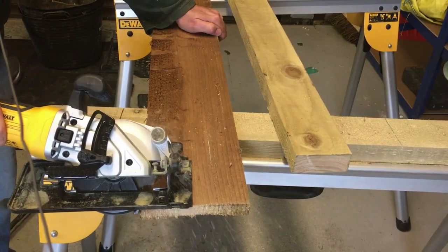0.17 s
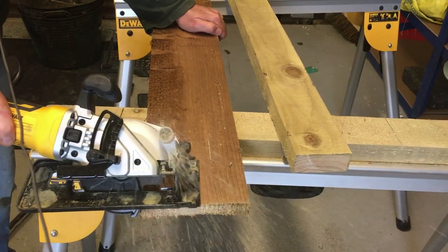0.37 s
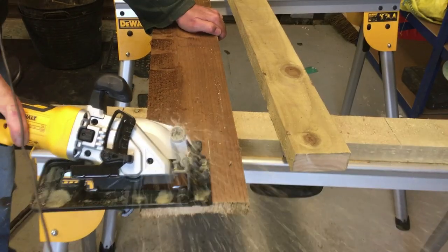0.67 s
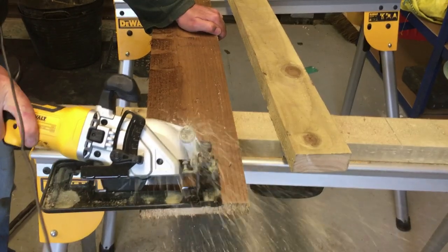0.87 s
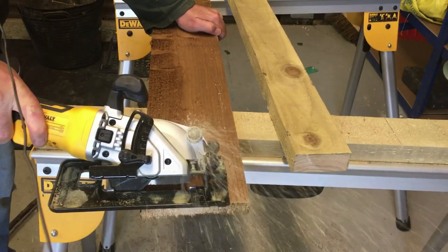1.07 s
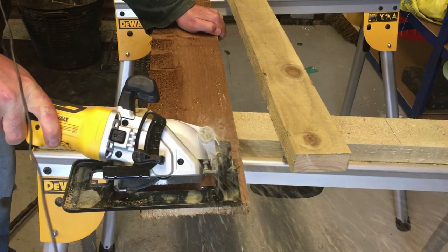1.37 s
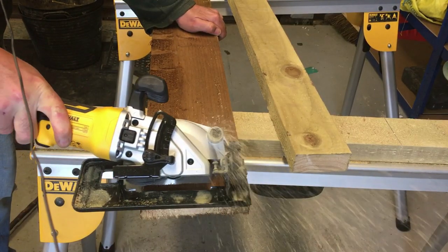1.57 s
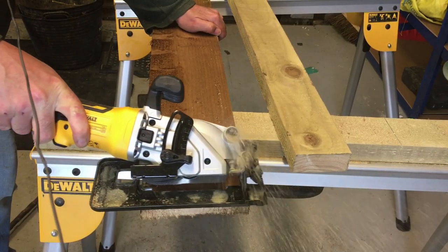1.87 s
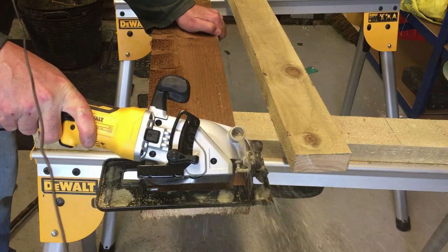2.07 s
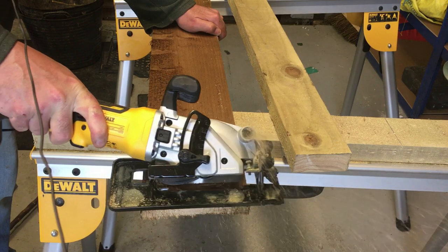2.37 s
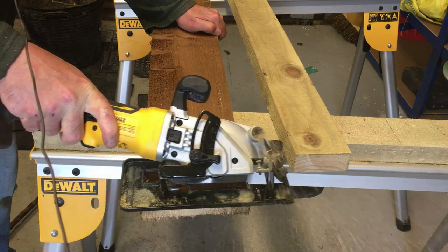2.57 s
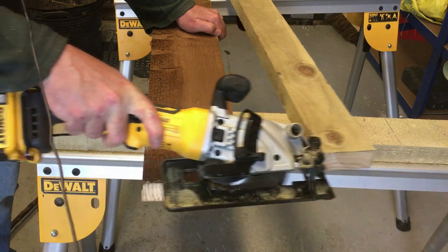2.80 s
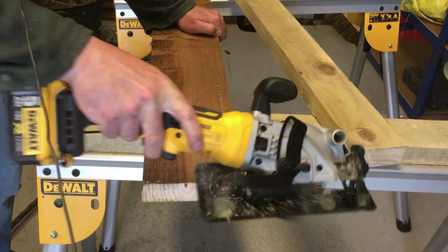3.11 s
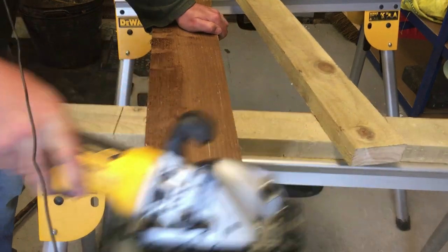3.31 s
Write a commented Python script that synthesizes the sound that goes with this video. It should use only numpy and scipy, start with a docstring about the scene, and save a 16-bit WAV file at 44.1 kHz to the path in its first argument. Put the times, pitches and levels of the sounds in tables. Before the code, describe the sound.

Close up in a garage, a cordless circular saw whines and bites into wood, squealing briefly and dropping in pitch. The last fibres splinter, the motor speeds up again, and the blade brakes with a knock and faint ringing.

```python
"""A small cordless circular saw crosscuts a board in a garage, heard close up on one mono microphone.
First the geared motor whines and the fan rushes. The teeth graze, then bite; the motor sags under
the load, brief high squeals come and go, and the last fibres splinter. The blade comes free;
just after 3 s the brake stops it with a knock and a rattle, and it rings out.
The walls answer briefly throughout, and a limiter holds the peaks."""
import sys
import numpy as np
from scipy import signal
from scipy.fft import rfft, irfft, next_fast_len
from scipy.io import wavfile
from scipy.ndimage import uniform_filter1d, minimum_filter1d, map_coordinates

SR = 44100
rng = np.random.default_rng(int(sys.argv[2]) if len(sys.argv) > 2 else 0)


def store_wav(level_fs):
    """Save 16-bit WAV to argv[1]."""
    pcm = np.round(np.clip(np.atleast_2d(level_fs), -1, 1) * 32767)
    wavfile.write(sys.argv[1], SR, pcm.T.astype(np.int16))


N = 152145

TEETH, FAN_BLADES, GEAR_RATIO = 24, 9, 5.918  # the ratio is motor turns per blade turn
LIFT_S, BRAKE_S = 2.66, 3.071
CHATTER_S, CHATTER_PER_S = 7e-6, 190  # timing jitter of the strikes, and how fast it varies
SHUDDER_PER_S, SHUDDER_SHARE = 520, 0.42  # the faster part of the chatter, and its share of the power
GARAGE_DB, ROOM_TONE_DB = -10.5, -83.5
CEILING_DB, LIMITER_S, TOP_HZ = -28.2, 0.001, 15740

# The motor sags under load (time [s], speed [turns/s])
MOTOR_SPEED = [(0, 440), (.28, 433), (.45, 442), (.9, 440), (1.0, 449), (1.15, 427), (1.3, 401),
               (1.42, 390), (1.55, 356), (1.68, 334), (1.8, 330), (1.94, 326), (2.02, 331), (2.06, 348),
               (2.09, 388), (2.16, 411), (2.23, 414), (2.3, 426), (2.42, 394), (2.52, 389), (2.6, 398),
               (2.68, 447), (2.75, 470), (2.87, 440), (3.07, 440)]
# Unevenness of the strikes (time [s], roughness [0-1])
ROUGHNESS = [(0, .4), (1.0, .45), (1.15, .75), (1.45, .45), (1.7, .88), (2.05, .97), (2.15, .6),
             (2.35, .75), (2.55, .65), (2.7, .85)]
# The strikes stray in time as the cut deepens (time [s], stray [s])
STRIKE_STRAY = [(.9, .000003), (1.15, .000007), (1.4, .000005), (1.75, .000013), (2.05, .000014),
                (2.2, .000008), (2.6, .00001)]

# Each source over the cut (time [s], level [dB])
BITE_LEVEL = [(0, -73), (.3, -72), (.8, -61), (1.02, -66), (1.16, -55), (1.27, -66), (1.4, -60.5),
              (1.58, -54), (1.72, -44), (1.94, -44), (2.03, -39), (2.08, -61), (2.17, -48.5), (2.3, -49.5),
              (2.42, -49), (2.61, -53), (2.72, -61), (2.85, -85)]  # force of the teeth on the wood
HOWL_BOOST = [(0, 6), (.8, -7), (1.22, -6), (1.36, 10), (1.47, -3), (1.58, 1), (1.8, -1.5), (2.04, -3),
              (2.12, -2), (2.6, -3), (2.7, 16)]  # added mainly to the lowest tooth tones as the board howls
ZING_LEVEL = [(.2, -65), (.32, -58.5), (.8, -61.5), (.92, -59), (1.02, -63), (1.1, -58), (1.17, -54),
              (1.27, -62.5), (1.45, -63.5), (1.6, -55), (1.95, -52), (2.02, -41), (2.1, -61.5),
              (2.19, -51.5), (2.3, -55.5), (2.47, -56), (2.55, -49), (2.61, -51.5), (2.72, -68),
              (2.85, -86)]  # high overtones of the tooth rate
ZING_HALFWAY_OFFSET = [(.9, -5), (1.17, -11), (1.3, -5), (2.3, -6), (2.5, -8)]  # added to the tones halfway between those overtones
SINGING_LEVEL = [(0, -63), (.6, -58), (.79, -50), (1.0, -64), (1.27, -57), (1.35, -45), (1.46, -45.5),
                 (1.57, -51), (1.68, -46), (1.8, -40.5), (1.92, -44), (2.03, -39.5), (2.1, -56), (2.2, -50),
                 (2.45, -57), (2.8, -75)]  # board singing at the tooth rate
GRAZE_LEVEL = [(.25, -74.5), (.42, -67), (.76, -62), (1.0, -80), (1.3, -92)]  # glassy overtones of grazing teeth
BLADE_HUM_LEVEL = [(0, -66.5), (.9, -62), (1.1, -66.5), (2.7, -89.5)]  # every second tooth stirring the air
RASP_LEVEL = [(0, -54), (.2, -52), (.32, -52), (.85, -47.5), (.93, -47), (1.02, -50.5), (1.17, -44.5),
              (1.26, -51), (1.52, -52.5), (1.7, -47), (1.95, -49), (2.03, -43), (2.09, -47.5), (2.2, -48),
              (2.3, -44), (2.45, -52), (2.63, -43), (2.76, -61), (3.05, -55.5)]  # torn fibres and dust
HUM_LEVEL = [(0, -66.5), (.7, -80.5), (1.05, -71.5), (1.3, -60.5), (1.6, -80), (2.0, -72.5), (2.15, -67.5),
             (2.6, -67), (2.75, -63), (3.05, -67.5)]  # motor shaft
WHINE_LEVEL = [(0, -56.5), (.3, -49), (.8, -45.5), (1.0, -50), (1.4, -57), (2.0, -60), (2.16, -51),
               (2.3, -52), (2.5, -58), (2.67, -49), (2.8, -76)]  # fan blade tone
WHISTLE_LEVEL = [(0, -62.5), (2.6, -66), (2.85, -59), (3.05, -67)]  # high motor whistle
SCREECH_LEVEL = [(1.15, -79), (1.3, -50.5), (1.5, -46), (1.6, -65), (2.0, -56), (2.15, -75)]  # gear tone as the motor bogs down
RUSH_LEVEL = [(0, -49.5), (1.0, -49), (2.0, -52), (2.7, -45.5), (2.9, -50.5), (3.07, -54)]  # fan air
GRIND_LEVEL = [(3.07, -33), (3.12, -43.5), (3.16, -47.5), (3.19, -48.5), (3.25, -53.5), (3.33, -57.5),
               (3.38, -73)]  # gears under braking

# Tone colours (frequency [Hz], level [dB])
TOOTH_EQ = [(1300, -1), (1750, -2.5), (2600, 2.5), (3300, 4.5), (4000, -3), (4700, -2), (5300, -2),
            (6700, 5.5), (8000, 1.5), (9400, -15.5), (15700, -26)]  # tooth harmonics
HALFWAY_EQ = [(650, -5), (890, -10), (2000, 3.5), (2700, 7), (4400, -16.5), (5300, -6), (6200, 6.5),
              (8000, -0.5), (8900, -14), (15200, -45)]  # tones between them
THUD_EQ = [(25, 2), (80, 8), (115, 2.5), (160, 0), (300, 2.5), (600, -6), (2000, -37)]  # board shaking
SPLINTER_EQ = [(40, -5), (170, -14), (400, -9), (750, -5.5), (1100, 12.5), (1600, -11), (2300, 13.5),
               (3000, 1), (4500, -16), (15000, -29)]
ZING_EQ = [(7600, -35), (8700, -3.5), (9500, -2.5), (11800, -6), (12700, -7), (14500, -5), (15500, -6)]
RASP_EQ = [(100, -27), (400, -7.5), (1200, 1.5), (2400, -6.5), (3000, -3), (4600, 2.5), (6300, 15.5),
           (7100, 12), (7600, 6), (9000, 3), (10500, -1), (13000, 3), (16000, -12)]
THROUGH_BLADE_EQ = [(4000, -37), (5900, -22), (6600, 3), (7000, -1), (7300, -15.5), (8800, -22), (12000, 2)]  # what the blade passes of the gear tones
RUSH_EQ = [(30, -16), (120, -13.5), (220, -15), (300, -7.5), (450, 0), (1200, 8.5), (1550, 5), (2400, 12.5),
           (3000, -3), (3750, 7), (4700, -4), (6500, 3.5), (8300, -0.5), (10500, -11), (16000, -19)]
KNOCK_EQ = [(100, -38), (400, -27), (800, -7), (1400, 9), (1800, 6), (2250, 4), (3000, -9), (5600, -9),
            (8000, -23), (16000, -27)]
CRACK_EQ = [(300, -17), (2500, -2), (5500, 10), (8500, 6), (12000, -8), (16000, -21)]
THUMP_EQ = [(40, -40), (100, -15), (160, 3), (230, -1), (320, 12), (520, 5.5), (750, 6.5), (1500, -13)]
GRIND_EQ = [(200, -26), (900, -11.5), (1500, 4.5), (1850, -7), (2280, 6), (2900, -8), (5500, -6.5),
            (6500, -3.5), (7200, -14.5), (15000, -34)]
BUMP_EQ = [(25, 12.5), (70, -10), (130, -2), (400, -20), (2000, -58)]
ROOM_TONE_EQ = [(25, 14), (100, 5), (600, 8), (3000, -22), (15000, -35)]

# How much of the howl's boost a tooth tone takes (frequency [Hz], share [0-1])
HOWL_SPREAD = [(1700, 1), (2700, 0), (4000, 0.21), (8000, 0.32), (11000, 0.24)]
# Grazing overtones (multiple of the tooth rate [ratio])
GRAZE_OVERTONES = [5.5, 6]
# Tones of the drive (order [cycles/motor turn], level [dB])
SHAFT_ORDERS = [(5, -69), (7, -68), (8, -57), (11, -71.5)]
GEAR_ORDERS = [(14, -51), (16, -54), (18, -55), (20, -47)]
# Ringing modes (frequency [Hz], level [dB], t60 [s])
CASING_MODES = [(764, -10.5, 0.12), (1359, -9, 0.21), (1936, -7, 0.16), (2440, -12, 0.13)]  # guard and shoe
BODY_MODES = [(348, -12, 0.12), (452, -7.5, 0.09), (526, -13.5, 0.12), (654, -12.5, 0.082)]  # the saw's body
BLADE_MODES = [(840, -64, 1.5), (1394, -66, 1.2), (2126, -58, 1.6), (2875, -64, 1.6), (5200, -67, 1.6),
               (6250, -52, .55), (6610, -51, .95), (7940, -58, .75)]  # the free disc

# The last fibres give way (time [s], level [dB], half width [s])
SPLINTER_EVENTS = [(1.937, -42, 0.012), (2.016, -29, 0.0077), (2.285, -43.5, 0.011)]
# Brief high squeals during the cut (time [s], frequency [Hz], level [dB], half width [s])
SQUEAL_EVENTS = [(0.32, 7010, -36, 0.061), (0.4, 9850, -50, 0.022), (0.525, 7180, -38.5, 0.0047),
                 (0.694, 6990, -56, 0.22), (0.873, 8800, -53, 0.055), (0.919, 7000, -39, 0.051),
                 (1.111, 6920, -44.5, 0.022), (1.168, 6910, -43.5, 0.027), (2.097, 6320, -35.5, 0.0078),
                 (2.49, 7920, -50, 0.045), (2.51, 2417, -48, 0.27), (2.544, 6320, -31.5, 0.045),
                 (2.655, 2357, -47.5, 0.061), (2.713, 2280, -36, 0.013)]
# The brake's knock and rattles (time [s], knock [dB], low thump [dB], sharp crack [dB])
BRAKE_KNOCKS = [(3.0712, -43, -48, -43), (3.0745, -36, -26, -33), (3.092, -38.5, -39, -39),
                (3.177, -44, -52, -49), (3.193, -43.5, -68, -56)]
# Dull bumps of handling (time [s], level [dB])
HANDLING_BUMPS = [(0.005, -57), (.115, -55), (1.851, -50), (2.379, -67), (2.951, -58), (3.289, -64.5)]
# Reverberation of the garage (frequency [Hz], t60 [s])
GARAGE_DECAY = [(200, 0.32), (2500, 0.38), (7000, 0.29), (15000, 0.15)]


def teeth(turns):
    """The teeth strike the wood in a stack of ragged tones; hard bites shake the board, fibres snap."""
    tooth_hz = curve(MOTOR_SPEED) * TEETH / GEAR_RATIO
    strikes = turns * TEETH / GEAR_RATIO + tooth_hz * CHATTER_S * wobble(CHATTER_PER_S)
    bite_db = curve(BITE_LEVEL) + 1.67 * wobble(29.33)
    halfway_db = np.minimum(bite_db - 6, -55.5)
    howl_db, rough = curve(HOWL_BOOST), np.clip(curve(ROUGHNESS), 0, 1)
    push, drag, flare_db = chatter(), chatter(), 2.6 * wobble(13)
    cut = np.zeros(N)
    for k in range(1, 15):
        hz = tooth_hz * k / 2
        phase = np.pi * k * strikes + rng.uniform(0, 2 * np.pi)
        if k % 2:  # left and right teeth differ, adding tones halfway between the harmonics
            level_db = halfway_db + along(HALFWAY_EQ, hz)
        else:
            level_db = bite_db + howl_db * along(HOWL_SPREAD, hz) + along(TOOTH_EQ, hz)
        cut += amp(level_db) * (hz < TOP_HZ) * ragged_tone(phase, rough, push, drag, flare_db)
    force_db = bite_db + 0.5 * howl_db + 42
    thud = amp(-60 + 2.5 * force_db + wobble(23.9)) * noise(THUD_EQ)
    splinters = sum(amp(db) * swell(s, half) for s, db, half in SPLINTER_EVENTS) * noise(SPLINTER_EQ)
    return (cut + thud + splinters) * powered()


def zing(turns):
    """High ragged overtones of the tooth rate sizzle, loudest late in the cut as the fibres splinter."""
    tooth_hz = curve(MOTOR_SPEED) * TEETH / GEAR_RATIO
    strikes = turns * TEETH / GEAR_RATIO + tooth_hz * curve(STRIKE_STRAY) * wobble(640)
    zing_db, halfway_db = curve(ZING_LEVEL) + 2 * wobble(170), curve(ZING_HALFWAY_OFFSET)
    push, drag, flare_db = wobble(CHATTER_PER_S), wobble(CHATTER_PER_S), 3.8 * wobble(26)
    rough, out = 0.92, np.zeros(N)
    for k in range(10, 24):
        hz = tooth_hz * k / 2
        phase = np.pi * k * strikes + rng.uniform(0, 2 * np.pi)
        level_db = zing_db + (k % 2) * halfway_db + along(ZING_EQ, hz)
        out += amp(level_db) * (hz < TOP_HZ) * ragged_tone(phase, rough, push, drag, flare_db)
    return out


def steady_tones(turns):
    """The cleaner voice of the teeth: a hum in the air, the board singing and grazing overtones."""
    order = TEETH / GEAR_RATIO
    hum = tone(turns, order / 2, curve(BLADE_HUM_LEVEL), flutter_db=1.5, jitter_rad=0.2)
    song = tone(turns, order, curve(SINGING_LEVEL), flutter_db=2.5, jitter_rad=0.4)
    graze = sum(tone(turns, k * order, curve(GRAZE_LEVEL), flutter_db=5, jitter_rad=0.6)
                for k in GRAZE_OVERTONES)
    return (hum + song + graze) * powered()


def rasp(turns):
    """Fibres tear in spurts, pulsing with each turn of the blade."""
    pulsing = 1 + 0.067 * np.sin(2 * np.pi * turns / GEAR_RATIO)
    spurts = amp(2.2 * wobble(500) + 1.6 * wobble(22))
    return amp(curve(RASP_LEVEL)) * unit(pulsing * spurts * noise(RASP_EQ)) * powered()


def squeals():
    """Brief high squeals during the cut: blade resonances and flaring motor and tooth overtones."""
    t, out = clock(), np.zeros(N)
    for s, hz, db, half in SQUEAL_EVENTS:
        envelope = amp(db + 2.5 * wobble(90)) * swell(s, half)
        out += np.sqrt(2) * envelope * np.sin(2 * np.pi * hz * t + 0.69 * wobble(110))
    return out


def motor(turns):
    """Shaft, fan and gears whine at multiples of the speed; in the wood, gear tones cross the blade."""
    hum = tone(turns, 1, curve(HUM_LEVEL), flutter_db=3, jitter_rad=0.18)
    whistle = tone(turns, 19, curve(WHISTLE_LEVEL), flutter_db=0, jitter_rad=0.97)
    shaft = sum(tone(turns, k, db, flutter_db=3, jitter_rad=0.73) for k, db in SHAFT_ORDERS)
    screech = tone(turns, 18, curve(SCREECH_LEVEL), flutter_db=1.5, jitter_rad=0.45)
    fan = tone(turns, FAN_BLADES, curve(WHINE_LEVEL), flutter_db=1.5, jitter_rad=0.15)
    mesh = sum(tone(turns, k, db, flutter_db=3, jitter_rad=0.6) for k, db in GEAR_ORDERS)
    in_wood = amp(curve([(0.15, -42), (0.3, 8.5), (2.62, -7.5), (2.78, -33)]))
    gears = in_wood * coloured(mesh, THROUGH_BLADE_EQ)
    lifted = amp(curve([(LIFT_S, 0), (LIFT_S + 0.095, -7.5)]))  # the motor turns from the microphone
    return (hum + whistle + screech + lifted * shaft + fan + gears) * powered()


def brake():
    """The gears slam together, rattle and grind to a halt, ringing the casing and the body."""
    out = np.zeros(N)
    for s, knock_db, thump_db, crack_db in BRAKE_KNOCKS:
        out += amp(knock_db) * (ring(s, CASING_MODES) + dying(s, t60=0.16) * noise(KNOCK_EQ))
        out += amp(crack_db) * dying(s, t60=0.026) * noise(CRACK_EQ)
        out += amp(thump_db) * (ring(s, BODY_MODES) + amp(-3.5) * dying(s, t60=0.1) * noise(THUMP_EQ))
    grind = amp(curve(GRIND_LEVEL) + wobble(150)) * noise(GRIND_EQ)
    return out + (clock() > BRAKE_S) * grind


def blade_ring():
    """The steel disc rings on once braked."""
    return sum(amp(db) * dying(BRAKE_S, t60) * np.sin(2 * np.pi * hz * clock() + 0.5 * wobble(20))
               for hz, db, t60 in BLADE_MODES)


def fan_rush():
    """The cooling fan drives air through the housing until it spins down."""
    return amp(curve(RUSH_LEVEL) + 1.1 * wobble(14)) * noise(RUSH_EQ) * powered(fall_db_per_s=132)


def bumps():
    """Soft low knocks as the saw and the board are handled."""
    knocks = sum(amp(db) * dying(s, t60=0.14) * (1 - dying(s, t60=0.014)) for s, db in HANDLING_BUMPS)
    return knocks * noise(BUMP_EQ)


def garage(x):
    """The walls' answer at the microphone, each frequency dying at its own speed."""
    hz, t, spectrum = signal.stft(rng.standard_normal(SR // 2), SR, nperseg=256)
    decay = np.exp(-np.log(1000) * t / along(GARAGE_DECAY, hz)[:, None])
    tail = signal.istft(spectrum * decay, SR, nperseg=256)[1]
    tail = np.pad(tail, (SR // 250, 0))  # 4 ms behind the direct sound
    return signal.fftconvolve(x, tail / np.linalg.norm(tail))[:N]


def chatter():
    """Random unevenness of the strikes, with a faster shudder in it."""
    slow, fast = wobble(CHATTER_PER_S), wobble(SHUDDER_PER_S)
    return np.sqrt(1 - SHUDDER_SHARE) * slow + np.sqrt(SHUDDER_SHARE) * fast


def ragged_tone(phase, rough, push, drag, flare_db):
    """A sine mixed with a noise band; a random time shift lets each tone chatter and flare alone."""
    shift = rng.integers(N)
    clean = np.sqrt(2 - 2 * rough ** 2) * np.sin(phase)
    ragged = np.roll(push, shift) * np.sin(phase) + np.roll(drag, shift) * np.cos(phase)
    return amp(np.roll(flare_db, shift)) * (clean + rough * ragged)


def tone(turns, order, level_db, flutter_db, jitter_rad):
    """One slightly unsteady multiple of the shaft rate."""
    peak = np.sqrt(2) * amp(level_db + flutter_db * wobble(34.51))
    return peak * np.sin(2 * np.pi * order * turns + jitter_rad * wobble(140))


def ring(start, modes):
    """Modes struck together and left to decay."""
    age = clock() - start
    return sum(amp(db) * dying(start, t60) * np.sin(2 * np.pi * hz * age) for hz, db, t60 in modes)


def powered(fall_db_per_s=400):
    """Full gain until the brake acts, then a fade."""
    return amp(-fall_db_per_s * np.maximum(clock() - BRAKE_S, 0))


def dying(start, t60):
    """A sudden start and an exponential decay."""
    age = clock() - start
    return (age >= 0) * np.exp(-np.log(1000) * np.abs(age) / t60)


def swell(centre, half_width):
    """A rise and fall around a moment."""
    return 1 / np.cosh(np.clip((clock() - centre) / half_width, -20, 20) * 1.67)


def wobble(rate):
    """A smooth random curve, rate knots a second."""
    return map_coordinates(rng.standard_normal(8192), [clock() * rate], mode="wrap")


def noise(colour):
    """Coloured noise of rms 1."""
    return unit(coloured(rng.standard_normal(N), colour))


def coloured(x, colour):
    """x through a (frequency [Hz], level [dB]) response."""
    size = next_fast_len(N + SR // 4)
    gain = amp(along(colour, np.fft.rfftfreq(size, 1 / SR)))
    return irfft(rfft(x, size) * gain, size)[:N]


def along(points, hz):
    """(frequency [Hz], value) points joined on a log axis."""
    frequencies, values = np.transpose(points)
    return np.interp(np.log(hz + 1), np.log(frequencies + 1), values)


def curve(rows):
    """(time [s], value) points joined by lines."""
    return np.interp(clock(), *np.transpose(rows))


def clock():
    """Time of each sample."""
    return np.arange(N) / SR


def amp(db):
    """Decibels to gain."""
    return 10 ** (np.asarray(db) / 20)


def unit(x):
    """Scale to rms 1."""
    return x / np.sqrt(np.mean(x ** 2) + 1e-20)


def scene():
    """One shaft drives the saw, close to the microphone; the walls and faint room tone lie behind."""
    turns = np.cumsum(curve(MOTOR_SPEED) * (1 + 0.001064 * wobble(25.13))) / SR
    saw = motor(turns) + teeth(turns) + zing(turns) * powered() + steady_tones(turns) + rasp(turns)
    saw += fan_rush() + brake()
    mono = saw + squeals() + blade_ring() + bumps()
    mono += amp(GARAGE_DB) * garage(saw) + amp(ROOM_TONE_DB) * noise(ROOM_TONE_EQ)
    return np.array([mono, mono])


def record(dry):
    """After the microphone: a fast limiter, then the band limit."""
    window = int(LIMITER_S * SR)
    needed_gain = np.minimum(1, amp(CEILING_DB) / (np.abs(dry) + 1e-9))
    limited = dry * uniform_filter1d(minimum_filter1d(needed_gain, window), window)
    size = next_fast_len(N + SR // 4)
    in_band = np.fft.rfftfreq(size, 1 / SR) < TOP_HZ
    return irfft(rfft(limited, size) * in_band, size)[:, :N]


dry = scene()
out = record(dry)
store_wav(out)
```